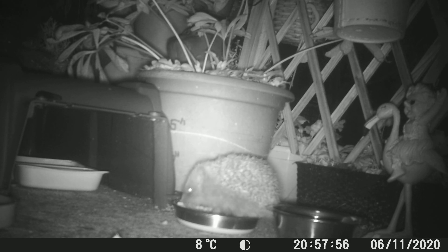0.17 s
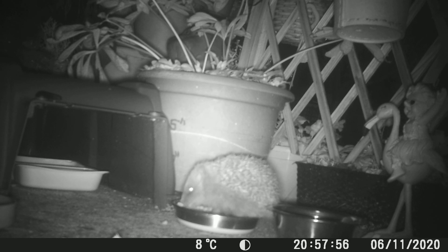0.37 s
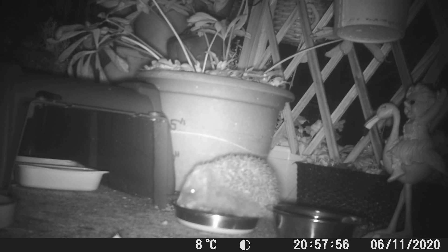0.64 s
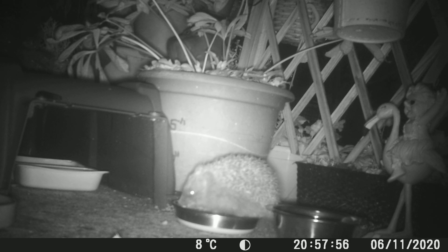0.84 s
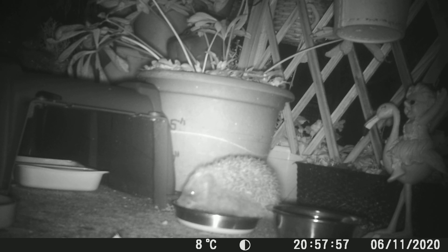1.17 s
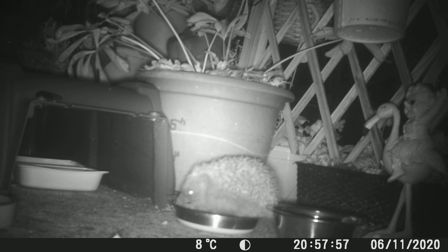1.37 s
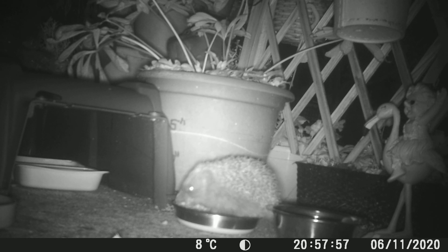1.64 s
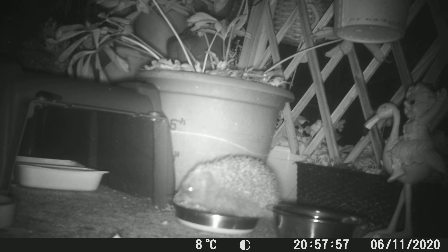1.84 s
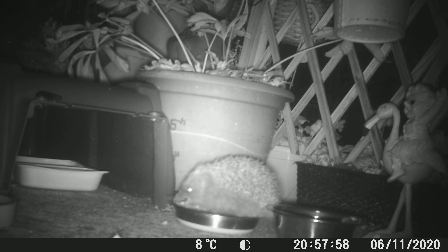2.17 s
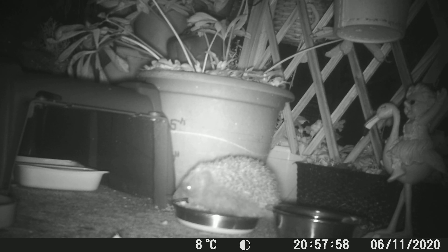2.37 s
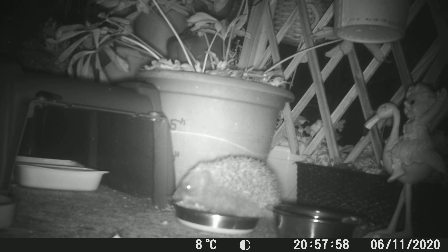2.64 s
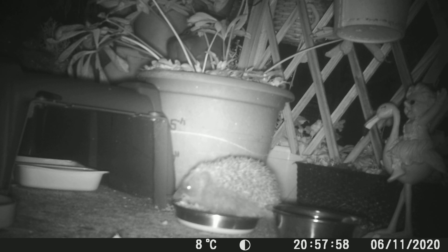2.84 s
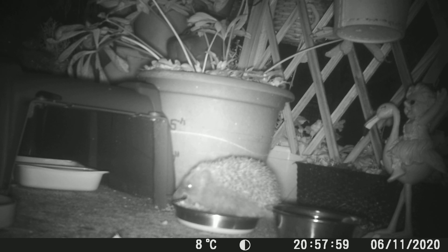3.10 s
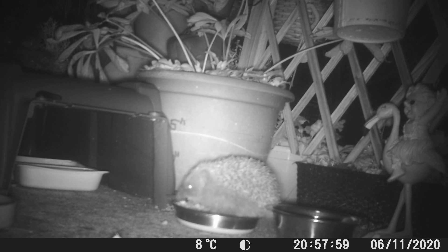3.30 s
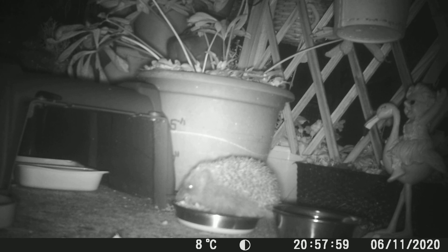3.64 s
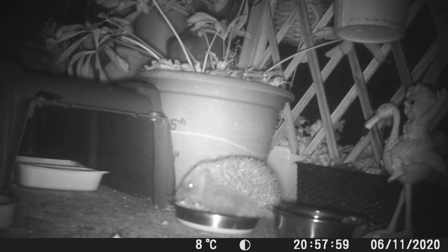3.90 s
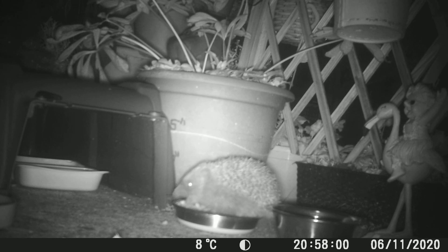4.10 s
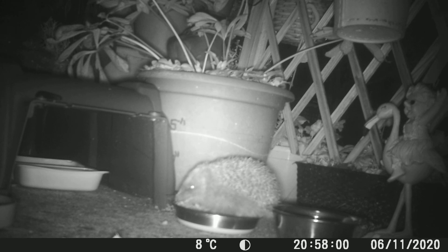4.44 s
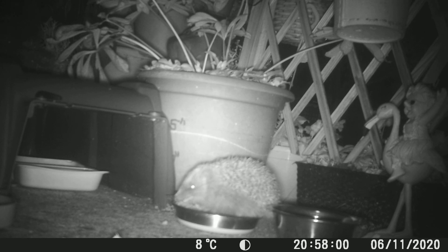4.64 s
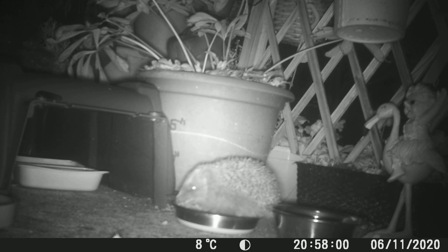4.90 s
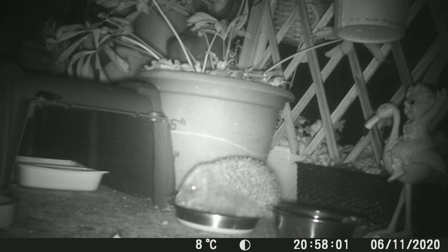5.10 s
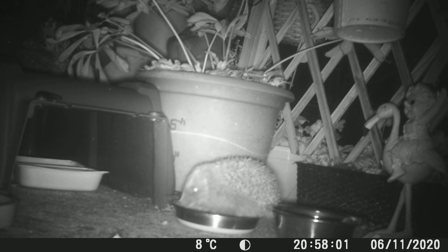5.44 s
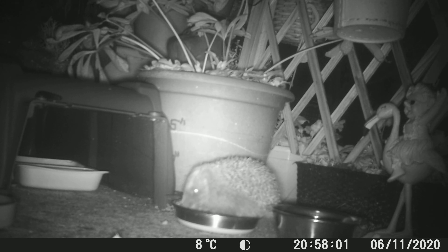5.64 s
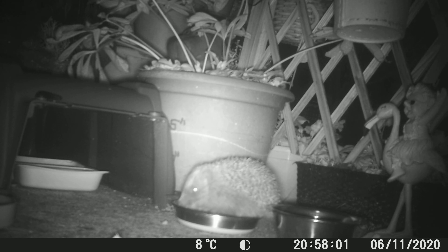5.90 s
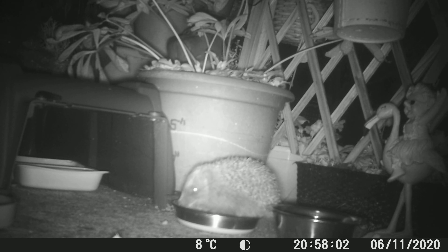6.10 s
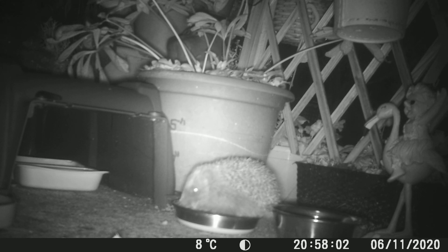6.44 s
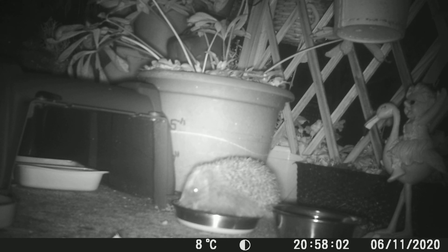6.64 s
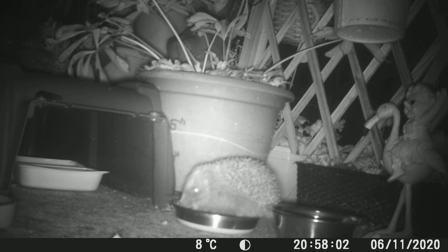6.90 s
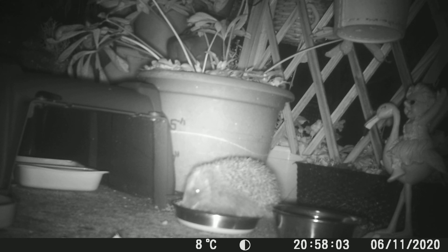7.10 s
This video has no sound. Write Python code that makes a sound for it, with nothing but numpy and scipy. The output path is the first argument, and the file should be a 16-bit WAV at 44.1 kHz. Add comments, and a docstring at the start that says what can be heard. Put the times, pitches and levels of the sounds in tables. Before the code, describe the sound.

Quiet, close crunching of dry food opens the scene as a hedgehog feeds outdoors at night, and one crumb tinks into its steel dish. The dish then rocks on the paving six times, each a quick cluster of dull thuds and light clacks, while the chewing thins out and stops. The small microphone also picks up a steady low rumble, night air, hiss and tiny paired ticks.

```python
"""A hedgehog eats dry food from a steel dish on a patio at night, close to a trail camera.
Pellets crack and squeak between its teeth, its snout scrapes the dish, and one crumb drops in.
About once a second the dish rocks and skids, always with the same short run of soft knocks;
each knock sets off a hollow ring in the camera's housing.
Behind it lie a low rumble, night air, the camera's hiss and faint paired ticks from its electronics."""
import sys
import numpy as np
from scipy import signal
from scipy.fft import rfft, irfft
from scipy.io import wavfile
from scipy.ndimage import uniform_filter1d

SR = 44100
rng = np.random.default_rng(int(sys.argv[2]) if len(sys.argv) > 2 else 0)


def wav_out(sig):
    """Save sig, one row per channel (or a flat mono array), as 16-bit PCM at SR to the path in sys.argv[1]."""
    wavfile.write(sys.argv[1], SR, np.round(np.clip(np.atleast_2d(sig).T, -1, 1) * 32767).astype(np.int16))


N = 320607

# Pellets cracking. Each row: start in seconds, base levels of the crack and of the dish's ring in dB,
# extra level for the crunch in dB, fade time in seconds.
PELLET_BITES = [(.434, -75.5, -82, 5, 0.0046), (.883, -75.5, -91, 6.5, .004), (.955, -58.5, -69, 0, 0.0044),
                (1.084, -54.5, -61.5, 0.5, 0.0044), (1.104, -63, -66, -10, 0.0066),
                (1.299, -70.5, -72, 6, 0.0074), (1.361, -68.5, -63.5, 4, .004),
                (1.394, -68, -64, 8, 0.0024), (1.402, -61.5, -71.5, -8, 0.0074),
                (1.437, -71, -61, -1, .006), (1.681, -64.5, -69, 4, 0.0077), (1.931, -75.5, -66, 9, .008),
                (1.954, -69.5, -75, 8, 0.0062), (2.05, -63, -58, -5.5, 0.0064),
                (2.099, -66.5, -65, -3.5, 0.0035), (2.14, -69, -77, -11, .004),
                (2.368, -61.5, -57.5, -3, .01), (2.405, -67.5, -63, 1, 0.0087),
                (3.020, -63, -82, -2, 0.0054), (3.078, -66.5, -86, -3, .008),
                (3.611, -70, -72, -0.5, 0.0059), (4.321, -68, -61.5, 1, .006)]
# Teeth squeaking. Each row: start in seconds, level in dB, pitch in Hz, length in seconds.
TOOTH_SQUEAKS = [(1.93, -70.5, 5400, 0.022), (1.954, -66, 5550, .009), (2.371, -66.5, 5860, 0.015),
                 (3.047, -67.5, 5880, 0.026), (3.074, -69, 5630, 0.03), (4.319, -68.5, 5480, 0.016)]
# The snout scraping the dish. Each row: start in seconds, length in seconds, level in dB.
SNOUT_SCRAPES = [(1.139, .03, -63.5), (1.2, 0.031, -66), (1.416, 0.023, -61.5), (1.461, 0.011, -67.5),
                 (1.718, 0.028, -66.5), (1.79, .013, -68.5), (1.995, 0.014, -72), (4.387, 0.025, -71)]
# The dish rocking.
# Each row: start in seconds, then dB added to the thuds, the camera housing's ring, the clacks, the skids.
DISH_ROCKS = [(1.120, 0, 3, 2, 2), (2.297, 0.5, 0.5, 2.5, 0), (3.181, 0.5, -1, -1.5, -1),
              (3.938, 1, -4, -4, 0), (4.963, -1, -9.5, -2, 1.5), (5.821, 4.5, 6, 1.5, -2.5)]
# The knocks in one rock: tip, catch, slump, landing, rebound.
# Each row: delay in seconds, then base levels in dB of the thud, the housing's ring and the rim clack.
ROCK_KNOCKS = [(0, -45, -68, -75.5), (.066, -58, -64.5, -61), (.087, -48.5, -74, -69),
               (.134, -42, -70.5, -52.5), (.149, -51.5, -68, -61)]
# The skids at the catch and the rebound.
# Each row: delay and length in seconds, then base levels in dB of the knock tones, wall and grit.
ROCK_SKIDS = [(0.064, 0.045, -64.5, -72.5, -67.5), (0.158, 0.02, -62, -68.5, -72)]
# Five pairs of ticks. Each row: start within each second, then gap to the second tick, both in seconds.
TICK_PAIRS = [(.115, 0.025), (0.3, 0.042), (0.512, 0.027), (0.701, 0.037), (0.895, 0.035)]

# The tones things ring with. Each row: pitch in Hz, relative level in dB, seconds to fade by 60 dB.
KNOCK_TONES = [(69.3, -4.5, 0.083), (117.3, 10, 0.092), (184.6, -2.5, 0.064), (211, -1.5, 0.053),
               (254, -7.5, 0.026), (362.5, -13.5, 0.19), (465, -29, 0.047)]  # a low thud, with a hollow ring near 365 Hz from the camera's housing
WALL_TONES = [(1052, -11, 0.035), (1105, -3, 0.03), (1270, -9.5, 0.015)]  # the wall of the dish, damped by food
RIM_TONES = [(820, -7.5, .025), (946, 9, 0.015), (1018, -3, 0.044), (1120, -18, 0.0063), (1460, -7, 0.026)]  # the rim of the dish
CRUMB_TONES = [(4080, 0, 0.06), (4670, 0, .04), (5300, -3, .05)]  # steel hit by a crumb
TICK_TONES = [(4466, -7.5, 0.019), (5110, -8, 0.028)]  # the electronics

# The tone colours of the noises. Each row: frequency in Hz, relative level there in dB.
CRUNCH_COLOUR = [(1400, -14.5), (1900, -13), (2130, 0.5), (2350, -3), (2750, -16.5), (3150, -3.5),
                 (3500, -11), (3900, -11), (4400, -11.5)]  # the middle range of a crack
SNAP_COLOUR = [(3500, -34), (4500, -11), (5300, -1.5), (6100, 3), (6900, 6), (7230, 6.5), (7700, 3.5),
               (8500, -7)]  # its bright edge
RASP_COLOUR = [(500, 7.5), (750, 3), (1100, -8), (1600, -4.5), (2300, -6), (3200, -23.5)]  # grit under the rim
SKID_COLOUR = [(600, -5), (760, 4), (950, 0.5), (1200, -2), (1700, -12)]  # the base skidding on paving
FIZZ_COLOUR = [(1500, -11), (2100, -11), (2450, 5), (2900, -16), (3700, -3), (4100, -17.5), (4450, -5.5),
               (5100, 0.5), (5500, -15.5), (6200, -1), (6700, 0.5), (7000, 0), (7300, 0.5), (8100, -6.5)]  # the fizz after a tick
RUMBLE_COLOUR = [(12, -3.5), (27, 1.5), (42, -1.5), (64, 1), (85, -3), (110, -12), (130, -20), (158, -32)]  # the low rumble
AIR_COLOUR = [(130, -4.5), (160, -1), (195, 2.5), (260, -0.5), (330, -3.5), (366, -2.5), (400, -5.5),
              (520, -12), (700, -26)]  # night air
HISS_COLOUR = [(400, -8), (640, -6), (800, -1.5), (1060, 2.5), (1300, 0), (2100, -2), (3200, -6),
               (4000, -10), (4800, -13.5), (5800, -12), (6700, -8.5), (7350, -8.5), (8000, -12),
               (8600, -25)]  # microphone hiss

SLIP_RELEASE_S = 0.0079  # how quickly a push dies away


def bites(tail_db=-19, tail_s=.02, ring_up_db=3, snap_db=-0.5, crunch_db=-1, size=8192):
    """A pellet breaks in a run of tiny fractures; the shock also rings the wall of the dish."""
    t, out = np.arange(size) / SR, np.zeros(N)
    for s, db, ring_db, body_db, fade_s in PELLET_BITES:
        tail = from_db(tail_db) * np.exp(-t / tail_s)  # sent back by nearby pots and walls
        fractures = grains(per_s=9000, size=size) * (np.exp(-t / fade_s) + tail)
        add(out, s, level_to(colour(fractures, SNAP_COLOUR), db + snap_db))
        add(out, s, level_to(colour(fractures, CRUNCH_COLOUR), db + body_db + crunch_db))
        ring = soften(ringing(WALL_TONES), contact_s=0.012)
        add(out, s + .001, from_db(ring_db + ring_up_db) * ring)
    return out


def squeaks(width_hz=950, size=2048):
    """A tooth slips over a hard pellet: a short, rough, high chirp."""
    t, out = np.arange(size) / SR, np.zeros(N)
    for s, db, hz, length in TOOTH_SQUEAKS:
        band = signal.butter(2, [hz - width_hz / 2, hz + width_hz / 2], "band", fs=SR, output="sos")
        swell = np.sin(np.pi * np.sqrt(np.minimum(t / length, 1)))
        slip = rng.standard_normal(size) * swell
        add(out, s, level_to(signal.sosfilt(band, slip), db))
    return out


def scrapes():
    """The snout rubs along the wall of the dish and shakes it."""
    out = np.zeros(N)
    for s, length, db in SNOUT_SCRAPES:
        add(out, s, level_to(slipping(pushing(length), WALL_TONES), db))
    return out


def rocking(wall_db=-8, rasp_db=-14.5, rasp_s=.012, rim_lag_s=0.00256, size=4096):
    """The dish tips and falls back: each thud rings the camera's housing; the rim clacks and rasps."""
    t = np.arange(size) / SR
    out, grit = np.zeros((2, N))
    for start, thud_gain_db, housing_gain_db, rim_gain_db, _ in DISH_ROCKS:
        for delay, thud_db, housing_db, rim_db in ROCK_KNOCKS:
            s, clack_db = start + delay, rim_db + rim_gain_db
            thud = soften(ringing(KNOCK_TONES), contact_s=0.0016)
            add(out, s, from_db(thud_db + thud_gain_db) * thud)
            housing_ring = soften(ringing(KNOCK_TONES[5:]), contact_s=0.0019)  # the two highest tones
            add(out, s, from_db(housing_db + housing_gain_db) * housing_ring)
            clack = ringing(RIM_TONES) + from_db(wall_db) * ringing(WALL_TONES)
            add(out, s + rim_lag_s, from_db(clack_db) * soften(clack, contact_s=0.0034))
            rasp = grains(per_s=5300, size=size) * np.exp(-t / rasp_s)
            add(grit, s + rim_lag_s, level_to(rasp, clack_db + rasp_db))
    return out + colour(grit, RASP_COLOUR)


def skidding(grip=0.71, size=8192):
    """As the dish rocks, its base skids on the paving, hardest just as its grip breaks."""
    breakaway = 1 + 2 * grip * np.exp(-np.arange(size) / SR / SLIP_RELEASE_S)
    out, grit = np.zeros((2, N))
    for start, *_, gain_db in DISH_ROCKS:
        for delay, length, knock_db, wall_db, grit_db in ROCK_SKIDS:
            s, push = start + delay, pushing(length)
            add(out, s, level_to(slipping(push, KNOCK_TONES[2:]), knock_db + gain_db))
            add(out, s, level_to(slipping(push, WALL_TONES), wall_db + gain_db))
            scratch = grains(per_s=9200, size=size) * push * breakaway
            add(grit, s, level_to(scratch, grit_db + gain_db))
    return out + colour(grit, SKID_COLOUR)


def crumb(start_s=.461, db=-64):
    """One crumb falls back into the dish with a tiny tink."""
    out = np.zeros(N)
    add(out, start_s, from_db(db) * soften(ringing(CRUMB_TONES), contact_s=.00065))
    return out


def ticking(ring_db=-71.5, second_db=-2.5, fizz_db=-75.5, fizz_s=0.026, size=4096):
    """Five times a second the electronics give two tiny, uneven ticks, each trailed by a fizz."""
    fizz_fade = np.exp(-(np.arange(size) / SR / fizz_s) ** 2)
    rings, fizz = np.zeros((2, N))
    for whole_second in np.arange(0, N / SR):
        for offset, gap in TICK_PAIRS:
            for delay, db in (0, 0), (gap, second_db):
                jitter_s, uneven_db = rng.normal(0, [.003, 0.5])
                s = whole_second + offset + delay + jitter_s
                if s < N / SR:
                    tick = soften(ringing(TICK_TONES), contact_s=0.0023)
                    add(rings, s + .001, from_db(ring_db + db + uneven_db) * tick)
                    add(fizz, s, from_db(fizz_db + db / 2) * grains(per_s=8700, size=size) * fizz_fade)
    return rings + colour(fizz, FIZZ_COLOUR)


def background(rumble_db=-47.0, air_db=-72.0, hiss_db=-73.5):
    """A low rumble of even loudness, the steady wash of night air, and microphone hiss."""
    rumble = colour(rng.standard_normal(N), RUMBLE_COLOUR, size=16384)
    rumble /= np.sqrt(uniform_filter1d(rumble ** 2, size=SR // 3))  # even out the loudness
    air = from_db(air_db) * colour(rng.standard_normal(N), AIR_COLOUR)
    hiss = from_db(hiss_db) * colour(rng.standard_normal(N), HISS_COLOUR)
    return from_db(rumble_db) * rumble + air + hiss


def ringing(tones, size=8192):
    """One blow sets tones ringing, each a little different in strength and pitch every time."""
    t, out = np.arange(size) / SR, 0
    for hz, db, fade_s in tones:
        uneven_db, detune = rng.normal(0, [1.5, .005])
        fade = from_db(db + uneven_db - 60 * t / fade_s)
        out = out + fade * np.sin(2 * np.pi * hz * (1 + detune) * t)
    return out / np.abs(out).max()


def soften(x, contact_s):
    """A longer contact gives a sound a gentler start; the peak comes out at 1."""
    t = np.arange(len(x)) / SR
    rounded = x * (1 - np.exp(-t / contact_s))
    return rounded / np.abs(rounded).max()


def grains(per_s, size):
    """Tiny fractures or slips: random clicks of uneven size, with an average power of 1."""
    happens = rng.random(size) < per_s / SR
    clicks = happens * rng.choice([-1, 1], size) * from_db(2 * rng.exponential(1, size))
    return clicks / np.sqrt(np.mean(clicks ** 2) + 1e-20)


def slipping(push, tones, slips_per_s=2500):
    """A surface sticks and slips, ringing the tones for as long as the push lasts."""
    slips = grains(slips_per_s, len(push)) * push
    return signal.fftconvolve(slips, soften(ringing(tones), contact_s=0.00049))


def pushing(length, size=8192):
    """A push holds for its length in seconds, then lets go."""
    return np.exp(-np.maximum(np.arange(size) / SR - length, 0) / SLIP_RELEASE_S)


def colour(x, spectrum, size=4096):
    """Filter a sound to a tone colour; white noise keeps its power."""
    hz, db = np.transpose(spectrum)
    log_hz = np.log(np.maximum(np.fft.rfftfreq(size, 1 / SR), 1))
    outside = np.abs(log_hz - np.clip(log_hz, np.log(hz[0]), np.log(hz[-1])))
    gain = from_db(np.interp(log_hz, np.log(hz), db) - np.minimum(60 * outside, 70))
    # Fold the filter so that it never sounds before the click that sets it off.
    cepstrum = irfft(np.log(gain))
    cepstrum[1:size // 2] *= 2
    cepstrum[size // 2 + 1:] = 0
    response = irfft(np.exp(rfft(cepstrum)))
    return signal.fftconvolve(x, response / np.linalg.norm(response))[:N]


def level_to(x, db, size=132):
    """Bring a sound's loudest three milliseconds to a level in dB."""
    return from_db(db) * x / np.sqrt(uniform_filter1d(x ** 2, size).max() + 1e-20)


def from_db(db):
    """Turn decibels into a number to multiply by."""
    return 10 ** (np.asarray(db) / 20)


def add(track, s, sound):
    """Mix a sound into a track, starting at s seconds."""
    start = int(np.clip(round(s * SR), 0, N - 1))
    track[start:start + len(sound)] += sound[:N - start]


def scene():
    """Everything reaches one small microphone."""
    mix = background() + bites() + squeaks() + crumb() + rocking() + skidding() + scrapes() + ticking()
    return mix[None]


def record(dry, hollow_hz=625, hollow_q=3.5, depth=0.46, cutoff_hz=8450):
    """The camera's housing hollows out a narrow band, and the highest treble is cut steeply."""
    notched = signal.lfilter(*signal.iirnotch(hollow_hz, hollow_q, fs=SR), dry)
    housed = dry + depth * (notched - dry)
    treble_cut = signal.ellip(10, .3, 80, cutoff_hz, fs=SR, output="sos")
    return signal.sosfilt(treble_cut, housed)


dry = scene()
out = record(dry)
wav_out(out)
```